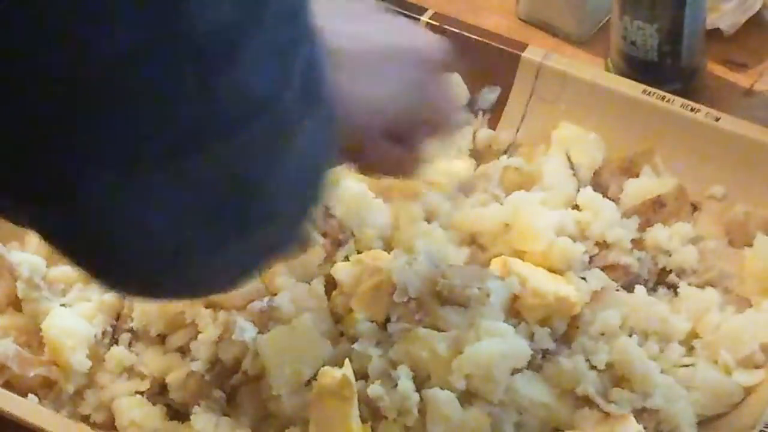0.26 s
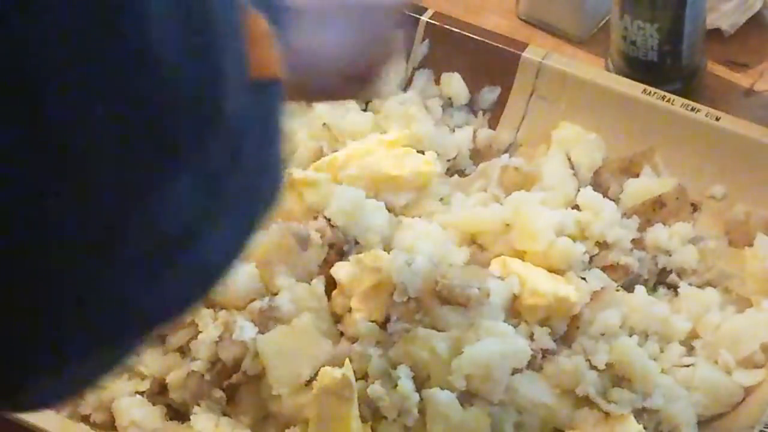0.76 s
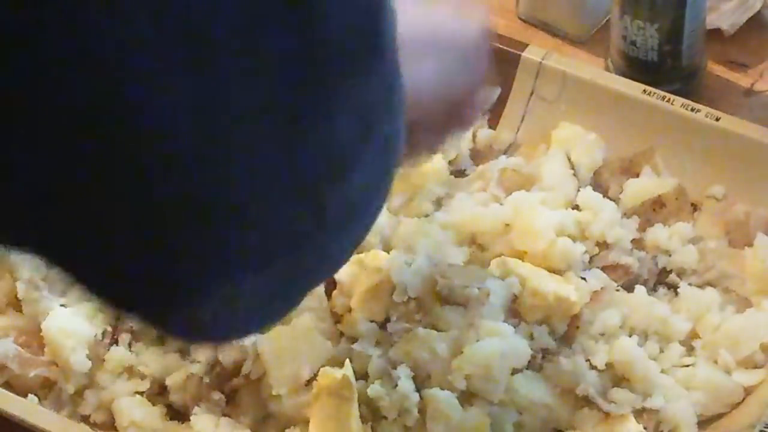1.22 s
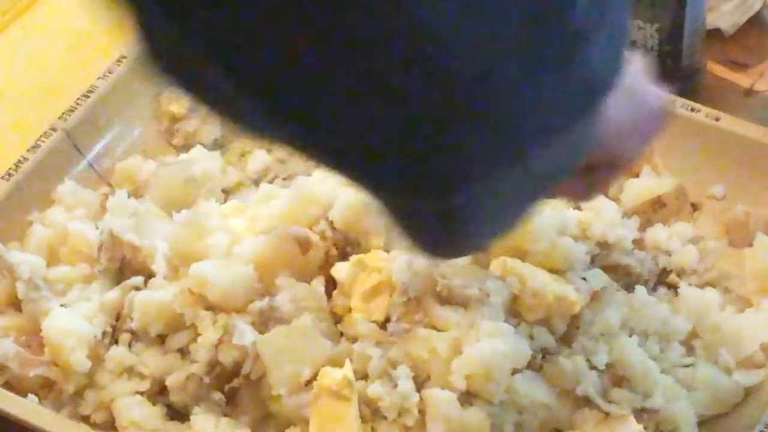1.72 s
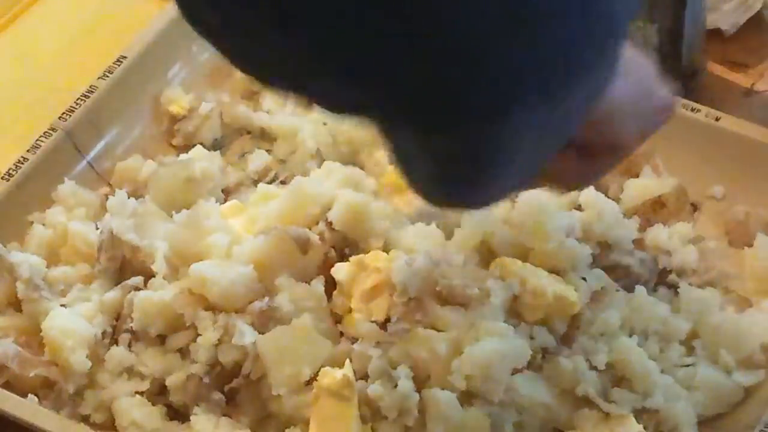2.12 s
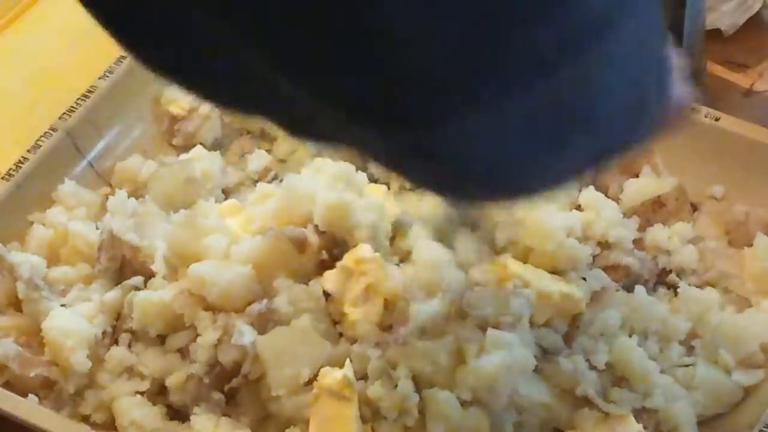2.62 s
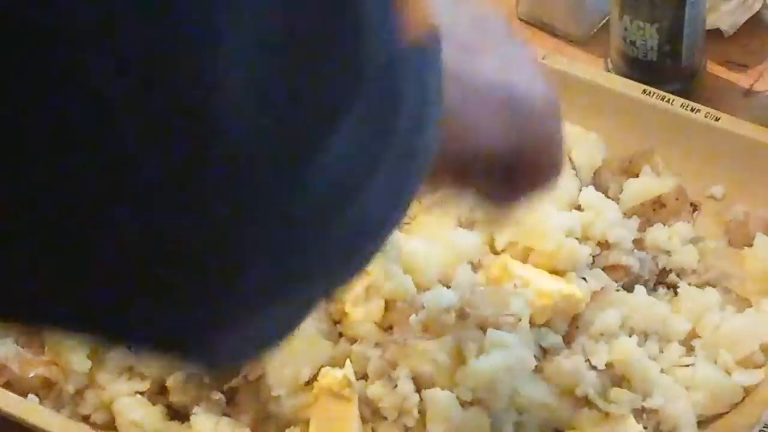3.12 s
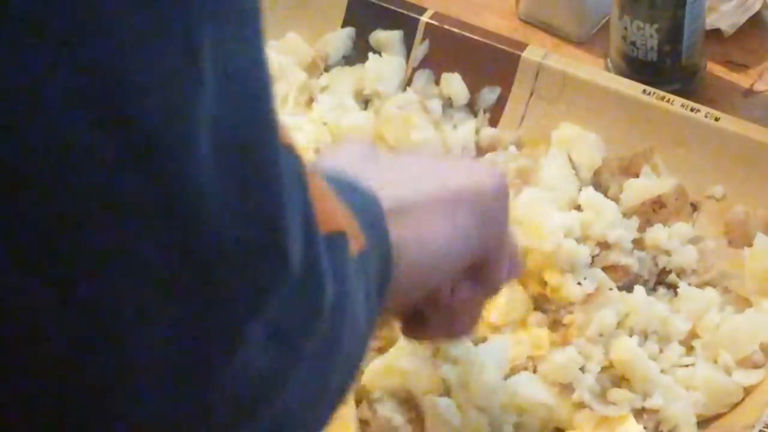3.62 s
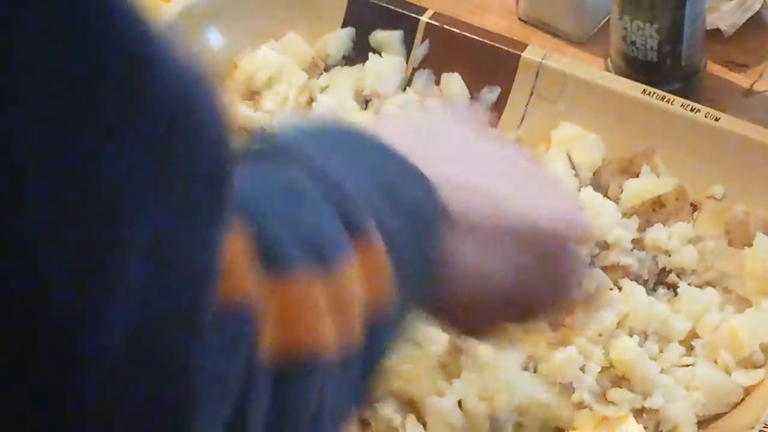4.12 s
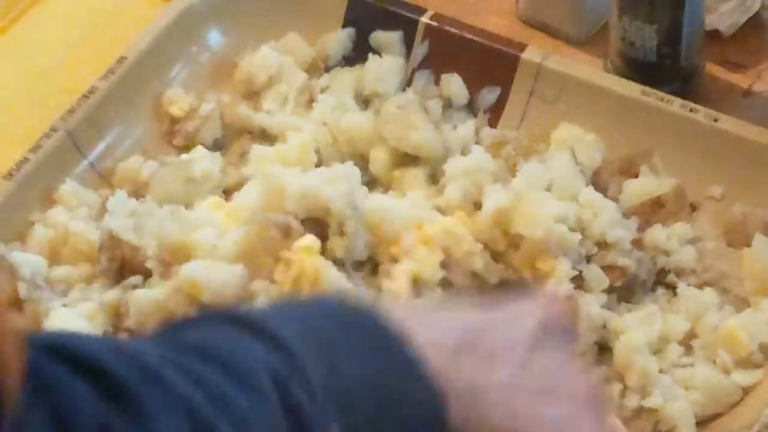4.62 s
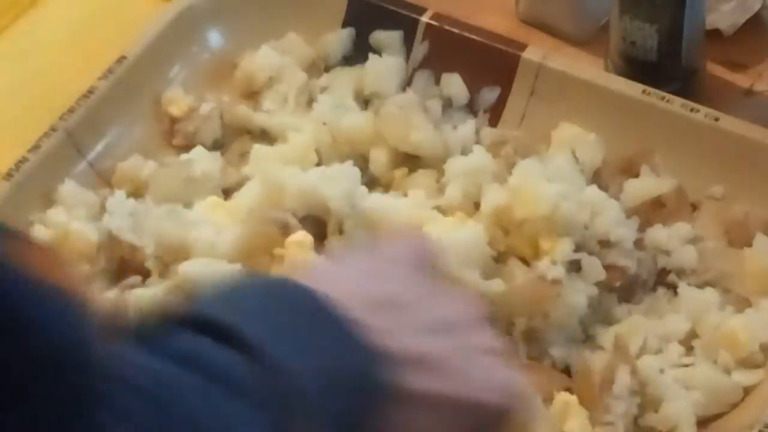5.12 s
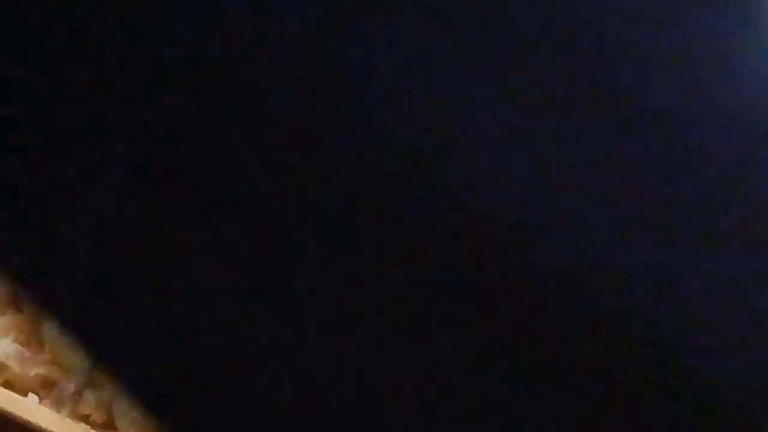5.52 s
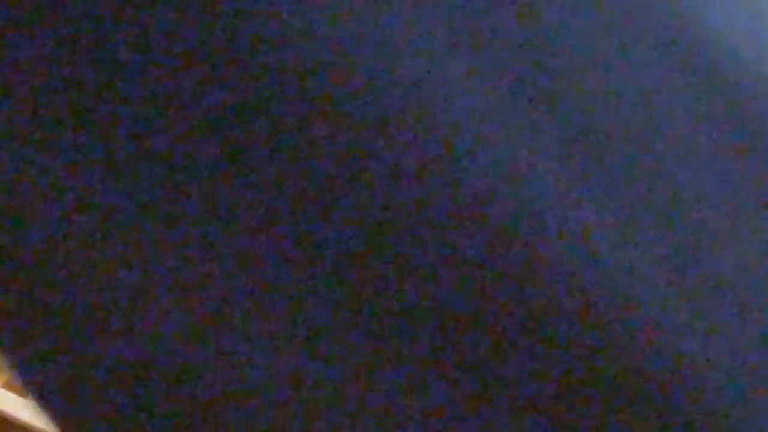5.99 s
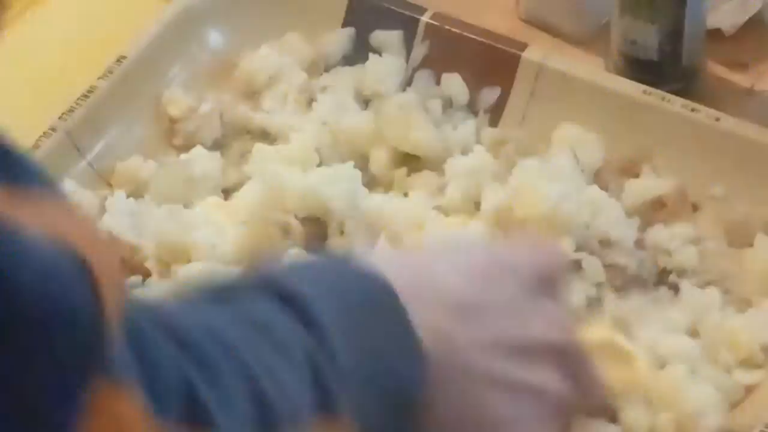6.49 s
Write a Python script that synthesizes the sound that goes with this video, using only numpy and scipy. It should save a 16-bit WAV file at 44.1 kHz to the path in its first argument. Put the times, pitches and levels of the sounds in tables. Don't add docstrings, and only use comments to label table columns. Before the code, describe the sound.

A close stereo pickup in a small, quiet kitchen with a faint low hum and soft hiss. A fork knocks on a tray rim at about 0.04, 0.3, 0.6, 0.95 and 1.3 seconds, starting soft and growing hard. Each is a short hollow clack with a brief low tray ring, chattering tines, a table shudder and quick room echo; a very faint metallic ring lingers after the last. From 1.6 to 2.6 come tiny sticky rustles and ticks as potato pulls from the tines. A wet squelch with a light tap lands at 2.8. Faint rustles around 3.6 and 4.05 lead to a crisp, crackling squish at 4.4 and another with a sharp tick, tap and soft thump at 4.75. Near-quiet follows, with faint dragging, then a softer moist press at 6.1 and a small faint squish with light taps at 6.6.

```python
import sys
import numpy as np
from scipy import signal
from scipy.fft import rfft, irfft, next_fast_len
from scipy.io import wavfile
from scipy.ndimage import uniform_filter1d

SR = 44100
rng = np.random.default_rng(int(sys.argv[2]) if len(sys.argv) > 2 else 0)


def waveform_to_disk(signal):
    frames = np.transpose(np.atleast_2d(signal))
    scaled = np.clip(frames, -1, 1) * 32767
    samples = np.round(scaled).astype(np.int16)
    wavfile.write(sys.argv[1], SR, samples)


def how_loud(loudness_db):
    steps = np.asarray(loudness_db, float) / 20
    return 10 ** steps


N = 297675

# (time [s], blow [dB], crack of the tines re blow [dB], edge of the tray re blow [dB], edge pitch [Hz])
BLOWS = [
    (0.037, -16, -21.5, -21.5, 2140),
    (0.324, -12, -24, -20.5, 1928),
    (0.622, -10.5, -23, -21, 1502),
    (0.941, -6, -20, -19.5, 2120),
    (1.317, -6.5, -25, -24.5, 1932),
]
# (frequency [Hz], level [dB per Hz])
SMACK_TONE = [(250, -46.5), (500, -15.5), (1100, -12), (1500, -14), (2150, -5), (2700, -6), (3300, -5),
              (4300, -11.5), (5500, -26), (8000, -62.5)]
# (frequency [Hz], side minus mid [dB])
STEREO_WIDTH = [(60, -9), (110, -11.5), (200, -8.5), (380, -7.5), (700, -0.5), (1290, 1), (2380, -0.5),
                (4400, 1), (8120, -8.5), (15000, -13)]


def gain(table, size):
    hz, db = np.transpose(table)
    bins_hz = np.arange(size // 2 + 1) * SR / size
    return how_loud(np.interp(np.log(bins_hz + 1), np.log(hz), db))


def colour(x, table):
    cepstrum = irfft(np.log(gain(table, size=4096)))
    folded = np.r_[cepstrum[0], 2 * cepstrum[1:2048], np.zeros(2048)]
    kernel = irfft(np.exp(rfft(folded)))[:2048]
    return signal.fftconvolve(x, kernel / np.linalg.norm(kernel))[:len(x)]


def pocket(x, hz, q):
    shape = signal.iirpeak(hz, q, fs=SR)
    once = signal.lfilter(*shape, x)
    return signal.lfilter(*shape, once)


def add(track, s, sound):
    i = int(s * SR)
    track[i:i + len(sound)] += sound[:N - i]


def spread(size):
    mid, side = rfft(rng.standard_normal((2, size)))
    share = gain(STEREO_WIDTH, size=size)
    both = np.array([mid + share * side, mid - share * side])
    return irfft(both / np.sqrt(1 + share ** 2), size)


def steady(table, db):
    size = next_fast_len(N)
    x = irfft(rfft(spread(size=size)) * gain(table, size=size), size)[:, :N]
    return x * how_loud(db) / x.mean(axis=0).std()


def hum():
    # (frequency [Hz], level [dB per Hz])
    hum_tone = [(24, -56.5), (45, -24), (86, -1), (161, -13.5), (234, -6), (267, -15.5), (300, -14),
                (377, -20.5), (668, -20), (774, -23.5), (973, -18.5), (1150, -28.5), (2000, -40.5),
                (2600, -66.5), (4400, -120)]
    return steady(hum_tone, -65)


def hiss():
    # (frequency [Hz], level [dB per Hz])
    hiss_tone = [(880, -30.5), (1500, -5), (2310, -9), (3380, -9), (4660, -9), (6560, -10), (9310, -21),
                 (14600, -12.5), (15700, -11.5), (16500, -32)]
    return steady(hiss_tone, -80.5)


def ring(modes, jitter_db=0):
    t = np.arange(SR // 2)[:, None] / SR
    hz, db, t60 = np.transpose(modes)
    sines = how_loud(db + jitter_db) * np.sin(2 * np.pi * hz * t)
    return np.sum(sines * 1000. ** (-t / t60), axis=1)


def without_bass(x, hz):
    return signal.sosfilt(signal.butter(4, hz, "highpass", fs=SR, output="sos"), x)


def knocks():
    # (frequency [Hz], level [dB], t60 [s])
    tray_modes = [(181.8, -9.5, 0.54), (203.7, -7.5, 0.11), (239.4, -14.5, .1), (291.5, -16, .1),
                  (337.5, -16.5, 0.19), (486.8, -8, .16), (549.7, -13, .16), (655, -22, 0.053),
                  (930, -14, 0.16), (965, -16.5, .1), (1097, -21, .1)]
    # (frequency [Hz], level [dB per Hz])
    blow_tone = [(60, -53.5), (130, -29.5), (180, 0.5), (260, -4), (390, -7.5), (490, 1), (570, -2.5),
                 (780, -4), (925, 3.5), (1100, -2.5), (1350, -9.5), (2000, -7.5), (3500, -27), (5000, -47)]
    # (frequency [Hz], level [dB per Hz])
    tine_tone = [(1500, -20), (3500, -9.5), (4800, -0.5), (6300, -3), (8500, -2.5), (9800, -9.5),
                 (11000, -10.5), (13000, -15.5), (16000, -20.5)]
    bass_growth = 0.73
    deep_stop_s = 0.09
    spot_db = 3.5

    snaps, near, far = np.zeros(N), np.zeros(N), np.zeros(N)
    t, ring_t = np.arange(2048) / SR, np.arange(SR // 2) / SR
    swing = (np.pi * 800 * (t - 0.003)) ** 2
    snap = (1 - 2 * swing) * np.exp(-swing)
    click = (t == 0) * 1.
    swell = 1 - np.exp(-ring_t / 0.0027)
    settle = np.exp(-(ring_t / deep_stop_s) ** 6)
    chatter = np.exp(-(t / 0.0036) ** 4) * np.minimum(t / 0.00042, 1)
    for s, blow_db, crack_db, edge_db, edge_hz in BLOWS:
        tine_noise, edge_noise = rng.standard_normal((2, len(t))) * chatter
        jitter_db = 2.5 * rng.standard_normal(len(tray_modes) - 2)
        deep = swell * settle * ring(tray_modes[:2])
        add(snaps, s, how_loud(blow_db - 0.6) * snap)
        add(near, s + 0.003, how_loud(bass_growth * (blow_db + 10) - 16) * deep)
        add(near, s + 0.00293, how_loud(blow_db - 7) * swell * ring(tray_modes[2:], jitter_db))
        add(near, s + 0.001, how_loud(blow_db + crack_db - 6.5) * colour(tine_noise, tine_tone))
        add(near, s + 0.00084, how_loud(blow_db + edge_db - 8.5) * colour(edge_noise, SMACK_TONE))
        add(near, s + 0.0009, how_loud(blow_db + edge_db + 7.5) * pocket(edge_noise, edge_hz, 2.5))

        whole = how_loud(9.5) * colour(click, blow_tone)
        whole += how_loud(crack_db + 16.5) * colour(click, tine_tone)
        whole += how_loud(edge_db + 19) * colour(click, SMACK_TONE)
        whole += how_loud(edge_db + 20.5) * pocket(click, edge_hz, 3.)
        spot = np.c_[np.geomspace(200, 16000, num=20), spot_db * rng.standard_normal(20)]
        recoloured = irfft(rfft(np.roll(whole, 256)) * gain(spot, size=len(t)))[256:]
        add(far, s, how_loud(blow_db) * recoloured)
    return without_bass(near, hz=139) + snaps, without_bass(far, hz=195)


def echoes(dry):
    # (left delay [s], right delay [s], level [dB])
    returns = [
        (.0034, 0.002, -8),
        (.0044, 0.003, -12.5),
        (0.0118, .0105, -14),
        (0.0136, 0.014, -12),
    ]
    response = np.zeros((2, SR // 20))
    response[:, 0] = 1
    for left_s, right_s, db in returns:
        response[[0, 1], [int(left_s * SR), int(right_s * SR)]] += how_loud(db)
    return signal.fftconvolve(dry[None], response, axes=1)[:, :N]


def room(dry, t60):
    # (frequency [Hz], level [dB])
    wall_tone = [(100, 11.5), (1000, 3), (4000, 1), (9000, -2), (16000, -5.5)]
    build_s = 0.0058
    t = np.arange(SR // 2) / SR
    tail = spread(size=len(t)) * (1 - np.exp(-(t / build_s) ** 2)) * how_loud(-60 * t / t60)
    tail /= np.sqrt(np.mean(np.sum(tail ** 2, axis=1)))
    return signal.fftconvolve(colour(dry, wall_tone)[None], tail, axes=1)[:, :N]


def kitchen(far):
    room_t60_s = 0.3
    late_db, late_t60_s, late_top_hz = -18, 0.84, 1290
    out = np.zeros((2, N))
    dull = signal.sosfilt(signal.butter(2, late_top_hz, fs=SR, output="sos"), far)
    for s, *_ in BLOWS:
        blow = slice(int(s * SR), int(s * SR) + 4096)
        tail = room(far[blow], room_t60_s) + how_loud(late_db) * room(dull[blow], late_t60_s)
        add(out[0], s, tail[0])
        add(out[1], s, tail[1])
    return out


def shake():
    shake_db, shake_s = -55, 0.16
    held, t = np.zeros(N), np.arange(SR // 4) / SR
    for s, *_ in BLOWS:
        add(held, s, np.exp(-(t / shake_s) ** 4))
    band = signal.butter(2, [35, 105], "bandpass", fs=SR, output="sos")
    low = signal.sosfilt(band, rng.standard_normal(N))
    return how_loud(shake_db) * uniform_filter1d(held, size=400) * low / low.std()


def fork_ring():
    # (time [s], frequency [Hz], level [dB], t60 [s])
    fork_modes = [
        (1.36, 1490, -67, 1.2),
        (1.36, 1507, -71, 1.),
        (1.655, 2440, -78, .6),
        (1.69, 2400, -75, .4),
    ]
    out = np.zeros(N)
    for s, *mode in fork_modes:
        add(out, s, ring([mode]))
    return out


def grains(rate, scatter_db):
    moment, sign, size = rng.random((3, N))
    x = (moment < rate / SR) * np.sign(sign - 0.5) * how_loud(-scatter_db * np.log(1 - size))
    return x / x.std()


def tent(s, db, swell, fade):
    late = np.arange(N) / SR - s
    return how_loud(db + np.where(late < 0, swell * late, -fade * late))


def tear(length):
    t = np.arange(SR // 8) / SR
    return (1 - np.exp(-t / (0.4 * length))) * np.exp(-(t / length) ** 2)


def patchy(x, spread_db):
    _, _, cells = signal.stft(x, nperseg=128)
    field = rng.standard_normal(cells.shape)
    field = uniform_filter1d(field, size=3, axis=0)
    field = uniform_filter1d(field, size=5, axis=1)
    return signal.istft(cells * how_loud(spread_db * field / field.std()), nperseg=128)[1][:N]


def tearing(bright, wet):
    # (frequency [Hz], level [dB per Hz])
    crackle_tone = [(2500, -38), (3500, -20), (4500, -10), (5500, -6), (6800, -4), (7700, -2.5),
                    (8450, 3.5), (9200, -3), (10200, -7), (12200, -7.5), (14000, -7), (16000, -21.5),
                    (16600, -40.5)]
    crackle = colour(bright * grains(12000, 2.0), crackle_tone)
    return crackle + colour(wet * grains(6000, 2.0), SMACK_TONE)


def mash():
    # (time [s], crackle [dB], wet smack re crackle [dB], pocket pitch [Hz])
    rustles = [(1.636, -65, 8, 4460), (1.659, -59, 6, 4800), (1.69, -65, 5, 4330), (1.72, -71, 5, 4300),
               (1.776, -53.5, -2, 3060), (1.804, -56, 2, 2500), (1.8274, -55, -5, 2500),
               (1.895, -59.5, -13, 3800), (2.149, -62, -4, 2770), (2.168, -50.5, -3, 1946),
               (2.202, -47, 1, 2300), (2.486, -55, -10, 3900), (2.589, -52, 2, 2560),
               (3.5885, -65, 0, 5000), (3.609, -62, -6, 2447), (3.664, -57.5, -20, 3810),
               (3.999, -51, -7, 5000), (4.04, -54.5, -15, 4990), (4.065, -64, -12, 2600),
               (4.105, -63, -15, 5000), (5.06, -63, -7, 1550), (5.113, -62.5, -6, 1543),
               (5.183, -72, -20, 1450), (6.188, -72, -7, 2920), (6.518, -69, -20, 1630)]
    # (time of peak [s], crackle [dB], wet smack re crackle [dB])
    drag_table = [(1.67, -73.5, 2.5), (1.8, -68.5, 1.5), (2.22, -67.5, 0), (2.46, -81, -18),
                  (2.74, -76, -17), (3.631, -69.5, -3), (4.07, -72, 0), (4.35, -69.5, -26), (4.71, -78, -3),
                  (5.18, -73, -6), (5.64, -68, -7), (5.72, -70, -6.5), (6.07, -73, -15), (6.24, -67, -2),
                  (6.6, -63, -10.5)]
    # (start [s], peak [s], level [dB])
    oozes = [
        (2.5, 2.53, -81),
        (2.766, 2.8, -43),
        (4.362, 4.397, -40),
        (4.72, 4.78, -45.5),
        (6.103, 6.134, -43),
        (6.59, 6.636, -55),
    ]
    # (time [s], crackle [dB], wet smack re crackle [dB], pocket pitch [Hz], length [s])
    squelches = [(2.502, -41.5, 7, 3040, .016), (2.5203, -41.5, 9, 2140, 0.0091),
                 (2.536, -44.5, 6.5, 2300, 0.017), (2.7654, -28.5, -3.5, 2190, .026),
                 (2.777, -30, 2, 2160, 0.015), (2.81, -38, -18, 2115, 0.024),
                 (4.36, -28.5, 0.5, 2200, 0.023), (4.379, -25, -20, 3160, 0.0059),
                 (4.3805, -28, -2, 2290, 0.036), (4.3985, -15.5, -20, 2373, 0.012),
                 (4.407, -47, -23, 3300, 0.011), (4.72, -23, 3, 1630, 0.0095),
                 (4.737, -24, 4, 1550, 0.0073), (4.7545, -26.5, 7.5, 2360, 0.011),
                 (4.7744, -21.5, 2, 3150, 0.0054), (4.783, -28, 1.5, 1970, 0.02),
                 (6.102, -35, 5, 3340, 0.0058), (6.111, -31.5, 0.5, 2160, 0.027),
                 (6.144, -36.5, 1, 3140, 0.019), (6.165, -43, 1, 5000, 0.024),
                 (6.5987, -41.5, 0, 2070, 0.0091), (6.609, -35.5, 3.5, 1930, 0.0085)]
    # (time [s], level [dB], length [s])
    pushes = [
        (2.769, -47.5, .035),
        (4.363, -44, 0.017),
        (4.411, -43.5, 0.023),
        (4.716, -38.5, 0.024),
        (4.7348, -32.5, 0.011),
        (4.789, -42.5, 0.0079),
        (6.104, -37.5, 0.0055),
        (6.112, -42, 0.026),
        (6.14, -42.5, 0.018),
        (6.189, -40.5, 0.012),
    ]
    rustle_s = 0.021

    drags = np.array([tent(s, db - 8.0, swell=120, fade=113.5) for s, db, _ in drag_table])
    bright = drags.sum(axis=0)
    wet = how_loud(np.array(drag_table)[:, -1]) @ drags
    for start, s, db in oozes:
        wet += tent(s, db - 8.5, swell=250, fade=303) * (np.arange(N) > start * SR)

    push, pops = np.zeros(N), np.zeros(N)
    bubbles = grains(8000, 2.0)
    for s, db, wet_db, pocket_hz, length in squelches + [(*row, rustle_s) for row in rustles]:
        shape = tear(length)
        add(bright, s, how_loud(db - 12.0) * shape)
        add(wet, s, how_loud(db + wet_db - 22.0) * shape)
        bubbling = shape * bubbles[int(s * SR):][:len(shape)]
        sharpness = 2.56 if db > -48 else 1.4
        add(pops, s, how_loud(db + wet_db - 3.5) * pocket(bubbling, pocket_hz, sharpness))
    for s, db, length in pushes:
        add(push, s, how_loud(db - 9.5) * tear(length))
    band = signal.butter(2, [140, 330], "bandpass", fs=SR, output="sos")
    thump = signal.sosfilt(band, push * rng.standard_normal(N))

    mid, side = tearing(bright, wet), tearing(bright, wet)
    side = irfft(rfft(side) * gain(STEREO_WIDTH, size=N), N)
    return patchy(mid + pops, 3.5) + 11 * thump, patchy(side, 3.5)


def bursts(table, length):
    out, t = np.zeros(N), np.arange(1024) / SR
    for s, db, hz in table:
        burst = pocket(rng.standard_normal(len(t)) * np.exp(-(t / length) ** 2), hz, 3.5)
        add(out, s, how_loud(db - 6.5) * burst / np.abs(burst).max())
    return out


def thread_snaps():
    # (time [s], peak level [dB], pitch [Hz])
    snap_table = [(1.64, -52.5, 5190), (1.7579, -49, 7300), (1.7759, -46, 8250), (1.8327, -49, 8320),
                  (2.146, -58, 7340), (2.1715, -48, 5030), (2.4892, -51, 6730), (2.5047, -34, 6900),
                  (2.5915, -46, 7100), (3.6177, -68, 8490), (3.6671, -60, 8300), (4.0053, -53, 6400),
                  (4.0447, -66, 8780), (4.0622, -43.5, 6150), (4.1111, -52, 5740), (4.363, -30, 6900),
                  (4.3879, -31, 8460), (4.7207, -16.5, 8100), (4.8024, -34, 4700), (5.0484, -64.5, 8460),
                  (5.0689, -71, 8760), (5.1891, -63, 8320), (5.608, -60, 5430), (6.106, -34.5, 8840),
                  (6.5101, -70, 8670), (6.6064, -40, 7550), (6.657, -53, 6500), (6.716, -64.5, 4500)]
    return bursts(snap_table, length=0.0036)


def tine_taps():
    # (time [s], peak level [dB], pitch [Hz])
    tap_table = [
        (2.522, -48, 2170),
        (2.7826, -24, 2140),
        (2.7994, -37, 2070),
        (4.7774, -31.5, 3200),
        (4.7824, -24, 2040),
        (6.6074, -39, 1920),
        (6.6139, -35, 2000),
    ]
    return bursts(tap_table, length=0.0031)


def scene():
    near, far = knocks()
    near += fork_ring()
    mid, side = mash()
    snaps, taps = thread_snaps(), tine_taps()
    tail = room(mid + how_loud(2.5) * snaps + how_loud(-21) * taps, t60=0.25)
    left_right = np.array([[1], [-1]])
    potato = mid + snaps + taps + side * left_right + how_loud(-4.5) * tail
    return echoes(near) + kitchen(far) + potato + hum() + hiss() + shake()


def top_cut(x):
    return signal.sosfilt(signal.butter(12, 16670, fs=SR, output="sos"), x)


def record(dry):
    lean_db = -1.3
    thin = signal.sosfilt(signal.butter(3, 60, "highpass", fs=SR, output="sos"), dry)
    mix = thin * how_loud(np.array([[lean_db], [-lean_db]]) / 2)
    return top_cut(mix)


dry = scene()
out = record(dry)
waveform_to_disk(out)
```